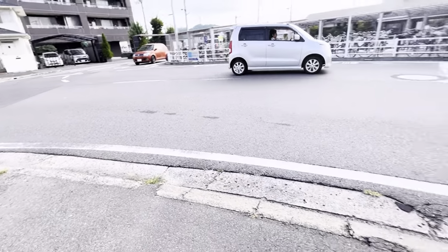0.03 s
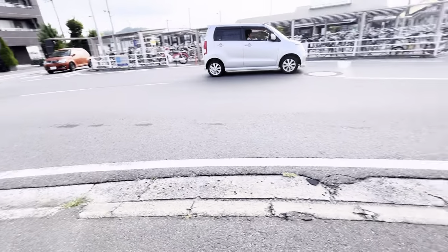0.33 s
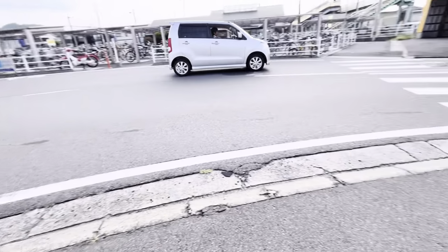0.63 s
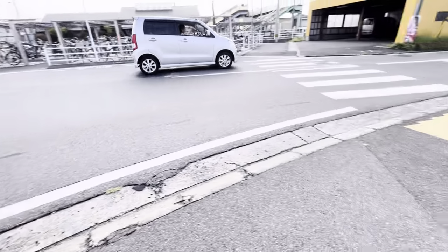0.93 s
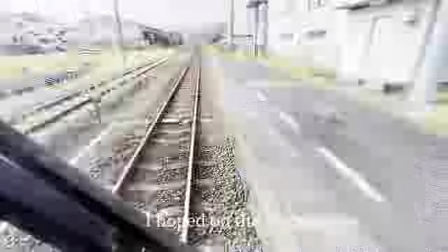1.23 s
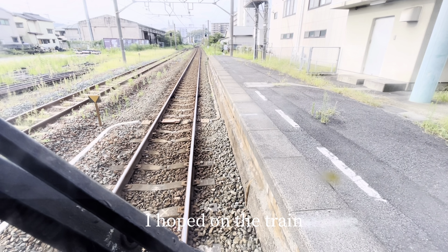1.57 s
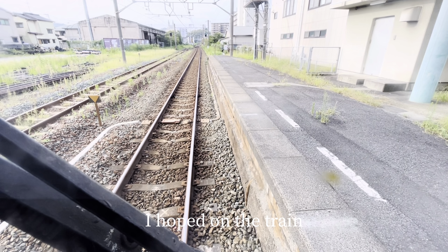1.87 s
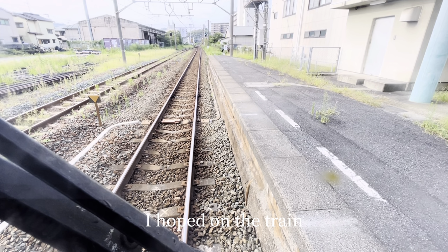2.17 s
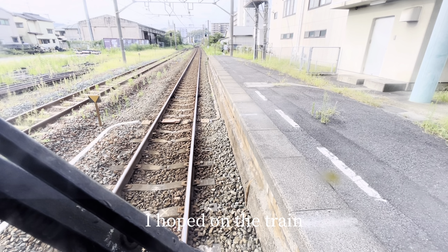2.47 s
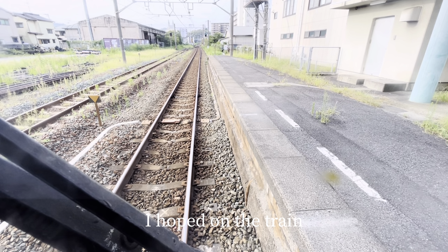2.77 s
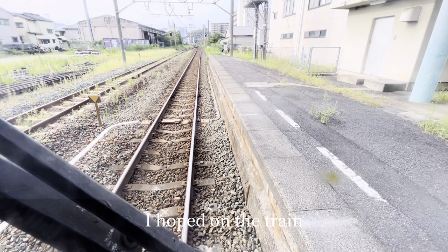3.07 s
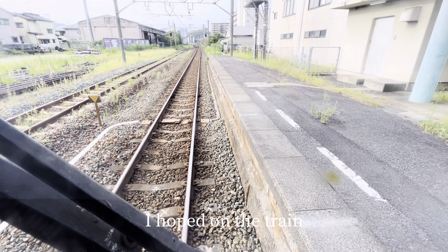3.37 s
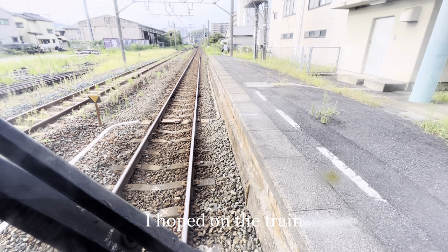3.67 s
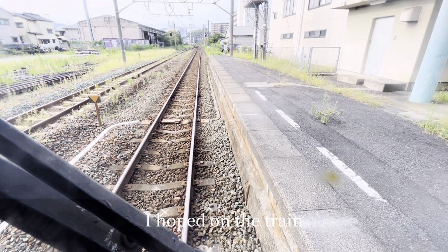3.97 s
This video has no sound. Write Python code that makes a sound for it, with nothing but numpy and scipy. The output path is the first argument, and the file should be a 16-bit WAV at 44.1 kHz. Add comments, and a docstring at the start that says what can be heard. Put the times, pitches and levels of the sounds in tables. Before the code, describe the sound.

A small car hums faintly amid distant traffic. At about 1.3 seconds a tick cuts to a diesel train idling, its low throb heard inside the cab until the end. Air hisses and a nearby door clunks heavily, its latch rattling and snapping until 1.8 seconds. A brief squeaky slide ends in another clunk at 2.5. A metal lever clicks around 3.1, over soft ventilation and faint air puffs.

```python
"""A small car drives off down a quiet street, faint at the stereo microphone. A tick, an instant of silence,
and we are in the cab of a diesel railcar standing at a platform. The engine throbs through the floor
and compressed air hisses away in puffs over the ventilation. Close by, a door clunks and shakes the
car body, its latch rattles, a catch snaps, something slides to a stop, and a small metal lever clicks.
Each blow is a burst of noise plus the ringing modes of the part that is struck."""
import sys
import numpy as np
from scipy import signal
from scipy.fft import rfft, irfft
from scipy.io import wavfile
from scipy.ndimage import uniform_filter1d

SR = 44100
rng = np.random.default_rng(int(sys.argv[2]) if len(sys.argv) > 2 else 0)


def master_out(mix):
    """Clip the mix to full scale and print it as 16-bit PCM to the path in sys.argv[1]."""
    frames = np.transpose(np.atleast_2d(mix))
    ceiling = np.clip(frames, -1, 1)
    pcm = np.round(ceiling * 32767).astype(np.int16)
    wavfile.write(sys.argv[1], SR, pcm)


N = 176400
T = np.arange(N) / SR

# The engine's tones, heard in the cab. Each row: multiple of the firing rate, level in dB.
ENGINE_ORDERS = [(1, -31.5), (1.4, -43.5), (1.575, -40), (2.6, -50), (3.14, -49), (4, -52.5), (6, -52.5),
                 (8, -48.5), (9.55, -50), (10.7, -51.5), (12.6, -53.5), (13.06, -52), (14.36, -56.5),
                 (16.12, -51), (18.07, -53.5), (19.28, -55)]
# Its roar through the floor. Each row: frequency in Hz, relative density in dB.
ROAR_SPECTRUM = [(25, -5), (50, 5.5), (90, 8), (125, 4), (180, -1.5), (235, 1.5), (295, -8), (370, -5.5),
                 (460, -2), (560, -4), (680, -8.5), (800, -7), (930, -5.5), (1020, -10), (1130, -9),
                 (1240, -17), (1420, -40.5), (1600, -55), (2000, -76)]
def diesel_idle(firing_hz=58.08, roar_db=-35.5, throb_depth=0.13):
    """The diesel idles under the floor: wavering tones, and a roar that pulses with each firing."""
    hz = firing_hz * (1 + 0.004133 * wander(5))
    tones = sum(undb(db + min(k, 2) * 1.15 * wander(8)) * tone(k * hz) for k, db in ENGINE_ORDERS)
    throb = 1 + throb_depth * np.sin(2 * np.pi * np.cumsum(hz) / SR)
    return tones + undb(roar_db + 0.61 * wander(24.5)) * throb * cab_noise(ROAR_SPECTRUM)


# The door, close by. Each row: start in seconds, level in dB, noise t60 in seconds, relative ring in dB.
DOOR_BLOWS = [(1.277, -32, 0.55, -19), (1.345, -34, 0.56, -0.5), (1.423, -21, 0.28, -3.5),
              (1.459, -18, 0.2, -5), (1.494, -21.5, 0.54, -10), (1.600, -26, 0.31, -1.5),
              (1.618, -25, 0.77, -1.5), (2.478, -20, 0.11, -11.5), (2.491, -21, 0.33, -13)]
# The panel's broad response. Each row: frequency in Hz, relative density in dB.
DOOR_SPECTRUM = [(25, -15), (55, -3), (110, 8.5), (180, 8), (260, 3.5), (390, 2), (480, -6.5), (620, -3.5),
                 (800, -11.5), (1100, -9), (1450, -27.5), (2500, -37), (6000, -88)]
# Its modes. Each row: frequency in Hz, relative level in dB, t60 in seconds.
DOOR_RING = [(172, -9, .2), (240, -2, .32), (360, -9, .25), (562, 0, .36), (624, 1, .26), (700, -9, .2),
             (900, -7, .2), (1060, -6, .18)]
def door():
    """The door panel clunks and rings low, in two clusters of blows."""
    return strikes(DOOR_BLOWS, DOOR_SPECTRUM, DOOR_RING, rise_s=0.005)


# Booms around the microphone. Each row: start in seconds, frequency in Hz, level in dB, t60 in seconds.
BODY_BOOMS = [(1.285, 74, -20, 0.067), (1.378, 49, -17, 0.26), (1.462, 122.4, -15, .12),
              (1.488, 89.5, -9, 0.077), (1.549, 73.4, -20.5, 0.37), (1.666, 85.5, -15, 0.16),
              (2.47, 61, -22, 0.076), (2.512, 50, -13.5, 0.23), (2.519, 106.5, -27.5, .25),
              (2.577, 61.4, -23, 0.39), (3.092, 215, -30.5, 0.15)]
def car_body(right_lag_s=0.00071):
    """The shaken car body booms in short, low tones that reach the left channel first."""
    t = T - np.array([[0], [right_lag_s]])
    return sum(undb(db) * np.sqrt(2) * np.sin(2 * np.pi * hz * (t - at)) * envelope(at, 0.014, 0, t60)
               for at, hz, db, t60 in BODY_BOOMS)


# Latch, catch and lever, near at hand. Blows, spectrum and ring have the same columns as the door's.
LATCH_BLOWS = [(1.423, -23, 0.23, -10), (1.437, -28.5, .2, -11), (1.447, -24.5, 0.5, -13),
               (1.618, -44, 0.35, -11), (1.647, -59, .25, -2)]
LATCH_SPECTRUM = [(400, -23), (650, 20), (1150, 12.5), (1480, -17), (1900, 4.5), (2900, 1), (3800, -2),
                  (5000, -5.5), (6500, -10.5), (8500, -16), (11500, -38), (14000, -49)]
LATCH_RING = [(1893, -4, .27), (2193, -4, .27), (2435, -2, .22), (2962, 0, .24), (3510, -9, .25),
              (4576, -8, .22), (4820, -5, .28), (6185, -11, .23), (7214, -14, .3)]
CATCH_BLOWS = [(1.753, -26, 0.2, -7.5), (1.767, -26, 0.22, -4), (1.786, -35, 0.39, -20),
               (2.865, -46.5, 0.28, -12)]
CATCH_SPECTRUM = [(300, 10.5), (600, 8), (780, 12), (980, 20.5), (1250, -5), (1460, -11), (1900, 5.5),
                  (2550, -10.5), (3150, 4), (3700, -8), (4350, 1.5), (4950, -9.5), (5400, -17),
                  (6200, -18.5), (7000, -20), (12000, -44)]
CATCH_RING = [(750, 2, .18), (904, 0, .22), (985, 0, .16), (1900, -5, .17), (1976, -9, .22), (3122, -5, .2),
              (4210, -7, .14), (4538, -12, .16)]
LEVER_BLOWS = [(3.024, -55, 0.87, -20), (3.061, -31, 0.18, 0.5), (3.077, -41, 0.22, -4)]
LEVER_SPECTRUM = [(400, -25), (800, 14.5), (1150, 3.5), (1480, -10.5), (2000, 2), (2500, -4), (3050, 7),
                  (3400, -4), (3750, 0), (4500, -12.5), (6000, -8), (6800, -9), (7300, -2.5), (8600, -10),
                  (11500, -16), (13000, -28), (15000, -41)]
LEVER_RING = [(790, 5, .16), (910, 4, .3), (2008, -12, .2), (3004, 2, .19), (3085, -6, .16),
              (3661, -11, .15), (7300, -10, .15), (7628, -15, .18), (8226, -19, .16)]
def metal_parts(rise_s=0.003):
    """Small metal parts ring brightly: the latch rattles, the spring catch snaps, the lever clicks."""
    latch = strikes(LATCH_BLOWS, LATCH_SPECTRUM, LATCH_RING, rise_s)
    catch = strikes(CATCH_BLOWS, CATCH_SPECTRUM, CATCH_RING, rise_s)
    lever = strikes(LEVER_BLOWS, LEVER_SPECTRUM, LEVER_RING, rise_s)
    return latch + catch + lever


# Sliding contact in the cab. Each row: frequency in Hz, relative density in dB.
RUB_SPECTRUM = [(200, 9), (700, 3), (1100, 8), (1300, -2), (1500, -15), (1900, -2.5), (3000, -7),
                (4000, -16.5), (6500, -19.5), (11000, -38), (14000, -64)]
def slide(start_s=2.415, rub_db=-34.5, grit_hz=258.4, squeak_hz=1247, squeak_db=-36.5):
    """Something squeaks as it breaks free, then sticks and slips into the last heavy clunk."""
    grit = undb(rub_db + 2 * wander(grit_hz))
    rub = cab_noise(RUB_SPECTRUM) * grit * envelope(start_s, rise=0.0092, hold=0.092, t60=0.34)
    squeak = tone(squeak_hz + 18 * wander(110)) * envelope(start_s, rise=0.01, hold=0, t60=0.19)
    return rub + undb(squeak_db) * squeak


# Air, heard from the cab. Each row: start, rise and hold in seconds, level in dB, t60 in seconds.
AIR_PUFFS = [(1.246, 0.016, 0.25, -42, 0.35), (1.92, 0.13, 0.091, -69, 0.95),
             (2.375, 0.0088, 0.15, -58.5, 0.28), (2.684, 0.012, 0.015, -65.5, 0.65),
             (3.103, 0.076, .03, -71, 0.63), (3.593, 0.46, 0.12, -66.5, .5)]
# Its hiss. Each row: frequency in Hz, relative density in dB.
AIR_SPECTRUM = [(700, 11.5), (1500, -12.5), (2100, 0.5), (2650, -3), (3050, 7.5), (3500, -6.5),
                (4700, -0.5), (5400, -7), (6500, 5), (7700, -6), (8600, -0.5), (10000, 0), (12300, -9),
                (13300, -31), (16000, -46)]
def compressed_air():
    """Compressed air escapes in fluttering puffs, the first by far the loudest."""
    puffs = sum(undb(db) * envelope(start, rise, hold, t60) for start, rise, hold, db, t60 in AIR_PUFFS)
    return cab_noise(AIR_SPECTRUM) * undb(0.96 * wander(29.97)) * puffs


# The car's hum, out in the street. Each row: multiple of the hum's pitch, relative level in dB.
HUM_ORDERS = [(.75, -6), (1, 2), (1.26, -2), (1.399, -15)]
# Its exhaust. Each row: frequency in Hz, relative density in dB.
EXHAUST_SPECTRUM = [(30, -20), (60, -2), (85, -3), (130, -14), (175, 4), (260, -30), (600, -62)]
def small_car(start_hz=214.2, climb_hz_per_s=12, hum_db=-53.5, exhaust_db=-56.5, swell_s=0.75):
    """A small car gathers speed: its hum climbs and swells along with the exhaust rumble."""
    hz = (start_hz + climb_hz_per_s * T) * (1 + 0.0075 * wander(12.4))
    hum = sum(tone(k * hz) * undb(hum_db + db + 2 * wander(8.35)) for k, db in HUM_ORDERS)
    exhaust = undb(exhaust_db + 2 * wander(14.8)) * noise(EXHAUST_SPECTRUM, STREET_WIDTH)
    return (hum + exhaust) * np.minimum(T / swell_s, 1)


# The tick that ends the street. Each row: frequency in Hz, relative density in dB.
TICK_SPECTRUM = [(500, -21.5), (1500, -10), (2500, -15), (3600, 0), (5000, -37), (9000, -9), (12000, -30),
                 (15000, -36)]
def tick(start_s=1.256, level_db=-38):
    """Bright noise switches on just before the street cuts off, leaving a tick."""
    return undb(level_db) * noise(TICK_SPECTRUM, STREET_WIDTH) * (T > start_s)


# Traffic in the distance. Each row: frequency in Hz, relative density in dB.
TRAFFIC_SPECTRUM = [(15, -55), (25, -25), (45, -1.5), (82, 1), (193, -8.5), (227, -4.5), (330, -8),
                    (420, -16), (703, -13), (1170, -21), (1300, -15.5), (1950, -24.5), (4000, -29),
                    (6300, -32), (9300, -37), (11200, -39), (12500, -57), (15500, -39)]
# Its course. Each row: time in seconds, level in dB.
TRAFFIC_LEVEL = [(0, -46), (.5, -44.5), (.85, -44.5), (1.22, -44.5)]
# The street's stereo width. Each row: frequency in Hz, side minus mid in dB.
STREET_WIDTH = [(40, -29), (70, 1.5), (130, -8), (220, -18), (380, -1), (700, -0.5), (1300, 3), (4400, -1),
                (15000, -0.5)]
def traffic():
    """Faint traffic blends into a low, nearly steady wash."""
    level_db = np.interp(T, *np.array(TRAFFIC_LEVEL).T) + 0.5 * wander(5)
    return noise(TRAFFIC_SPECTRUM, STREET_WIDTH) * undb(level_db)


# Ventilation, behind everything in the cab. Each row: frequency in Hz, relative density in dB.
VENT_SPECTRUM = [(800, -8), (1450, -1), (1950, 5), (2900, -4), (4000, -10), (6500, -17.5), (10000, -29),
                 (12000, -46), (15000, -56)]
# Its course. Each row: time in seconds, relative level in dB.
VENT_LEVEL = [(1.3, 5.5), (2.2, 1.5), (2.8, 0), (3.0, -2), (3.2, 0), (3.5, -2), (4, 0.5)]
def ventilation(level_db=-54.5):
    """The ventilation hisses softly, strongest at first."""
    swell_db = np.interp(T, *np.array(VENT_LEVEL).T) + 0.5 * wander(12)
    return undb(level_db + swell_db) * cab_noise(VENT_SPECTRUM)


# The cab's stereo width. Each row: frequency in Hz, side minus mid in dB.
CAB_WIDTH = [(40, -30), (65, -19), (110, -16.5), (200, -10), (380, -5), (700, -3.5), (1100, -5.5),
             (1500, 13), (2100, 1), (2800, -8), (4000, 2), (8000, -1.5)]
STANDING_WAVES = rng.standard_normal((2, 4000))  # one pattern of peaks and dips for each channel
def cab_noise(spectrum, depth_db=3.5, spacing_hz=27.73):
    """Coloured noise with the fine peaks and dips of a small hard room's standing waves."""
    place = np.arange(N // 2 + 1) * SR / N / spacing_hz
    ripple = np.array([np.interp(place, np.arange(len(row)), row) for row in STANDING_WAVES])
    above_bass = np.clip(place / 20 - 0.5, 0, 1)
    return unit(irfft(rfft(noise(spectrum, CAB_WIDTH)) * undb(depth_db * above_bass * ripple), N))


def strikes(blows, spectrum, modes, rise_s, beat_db=2.5, jitter_hz=18, scatter_db=1.2):
    """Each blow rings a part's modes in its own mix, roughened by loose contact, over a noise burst."""
    total = np.sqrt(sum(undb(db) ** 2 for _, db, _ in modes))
    voices = [(undb(db + beat_db * wander(60)) * tone(hz + jitter_hz * wander(110)), decay)
              for hz, db, decay in modes]
    out = 0
    for start, db, t60, ring_db in blows:
        mix = undb(scatter_db * rng.standard_normal(len(modes))) / total
        ring = sum(gain * voice * envelope(start, rise_s, 0, decay)
                   for gain, (voice, decay) in zip(mix, voices))
        burst = cab_noise(spectrum) * envelope(start, rise_s, 0, t60)
        out = out + undb(db) * (burst + undb(ring_db) * ring)
    return out


def tone(hz, diffuse_hz=400):
    """A stereo sine of rms 1; reflections part the channels in phase, more so up to diffuse_hz."""
    apart = min(np.mean(hz) / diffuse_hz, 1) ** 2 * np.pi / 4 * np.array([[1], [-1]])
    cycles = np.cumsum(np.broadcast_to(hz, N)) / SR + rng.random()
    return np.sqrt(2) * np.sin(2 * np.pi * cycles + apart)


def noise(spectrum, width):
    """Coloured stereo noise of rms 1; width sets the side against the mid."""
    mid, side = rfft(rng.standard_normal((2, N)))
    side = side * gains(width)
    return unit(irfft(np.array([mid + side, mid - side]) * gains(spectrum), N))


def wander(rate_hz):
    """Smooth random drift with a spread near 1."""
    span = int(SR / rate_hz)
    steps = np.repeat(rng.standard_normal(N // span + 1), span)
    return 1.378 * uniform_filter1d(uniform_filter1d(steps, span), span)[:N]


def envelope(start, rise, hold, t60):
    """Rise, hold, then fall 60 dB in t60; all in seconds."""
    release = np.maximum(T - start - rise - hold, 0)
    return np.clip((T - start) / rise, 0, 1) * np.exp(-np.log(1000) * release / t60)


def gains(points):
    """(Hz, dB) points as a gain for every frequency."""
    hz, db = np.array(points, float).T
    return undb(np.interp(np.log(np.arange(N // 2 + 1) * SR / N + 1e-3), np.log(hz), db))


def lean(x, balance):
    """Tilt a stereo sound to the left or right, frequency by frequency."""
    return irfft(rfft(x) * gains(balance) ** np.array([[0.5], [-0.5]]), N)


def undb(db):
    return 10 ** (np.asarray(db) / 20)


def unit(x):
    return x / np.sqrt(np.mean(x ** 2))


# Balance at the microphone in each place. Each row: frequency in Hz, left minus right in dB.
STREET_LEAN = [(90, -0.5), (200, 1.5), (480, 1.5), (650, -3), (900, 1), (1200, -1.5), (2300, 3), (3300, 0),
               (6200, -6.5), (10000, 1)]
CAB_LEAN = [(90, 0.5), (130, -4), (350, 0.5), (1700, -.5), (2900, 1), (3700, 4.5), (4600, 3), (6500, 9),
            (8000, 8.5), (10500, -3)]
def scene(street_end_s=1.259, cab_start_s=1.268):
    """The street, a tick and an instant of silence, then the cab with its treble leaning left."""
    street = lean(small_car() + traffic(), STREET_LEAN) + tick()
    cab = diesel_idle() + door() + car_body() + metal_parts() + slide() + compressed_air() + ventilation()
    fade_in = np.clip((T - cab_start_s) / 0.02, 0, 1)
    return street * (T < street_end_s) + lean(cab, CAB_LEAN) * fade_in


def record(dry, ceiling=0.62, top_hz=15750):
    """The deepest bass and very top are filtered away, and the loudest booms are softly limited."""
    thinned = signal.sosfilt(signal.butter(4, 30, "high", fs=SR, output="sos"), dry)
    limited = thinned / (1 + (thinned / ceiling) ** 4) ** (1 / 4)
    return signal.sosfilt(signal.ellip(8, 0.2, 70, top_hz, fs=SR, output="sos"), limited)


dry = scene()
out = record(dry)
master_out(out)
```